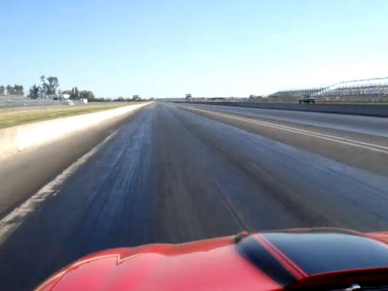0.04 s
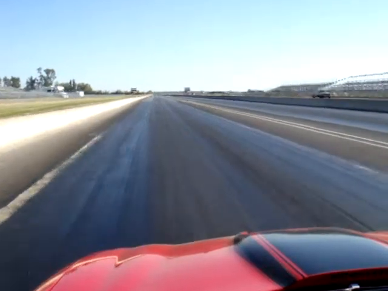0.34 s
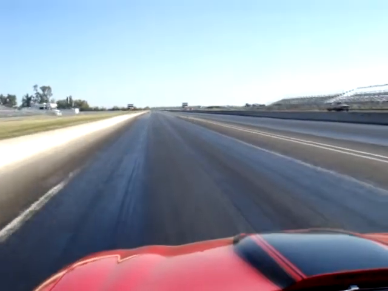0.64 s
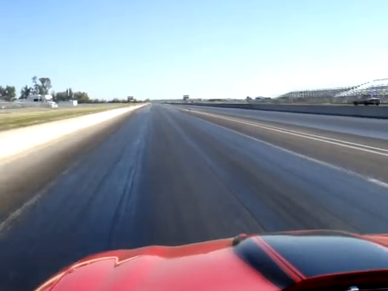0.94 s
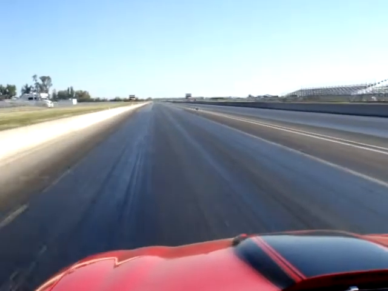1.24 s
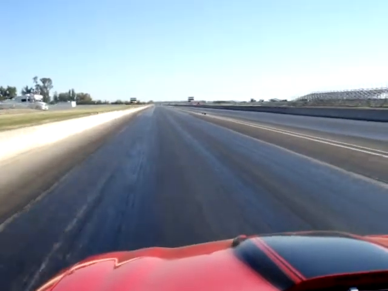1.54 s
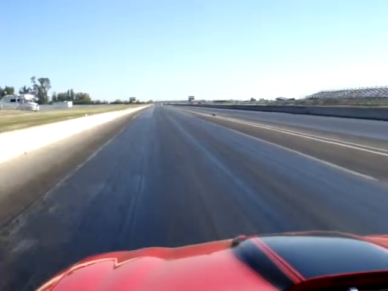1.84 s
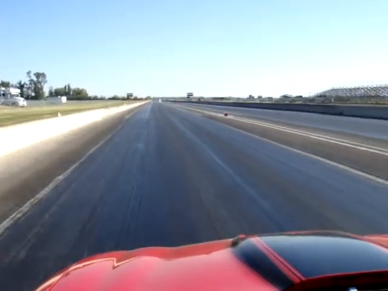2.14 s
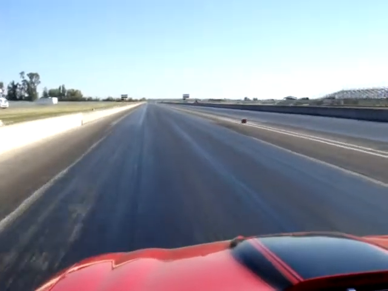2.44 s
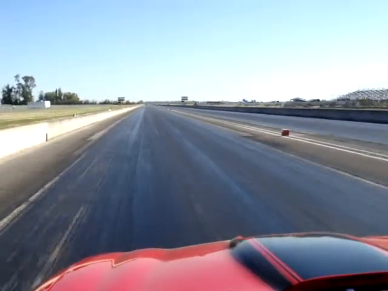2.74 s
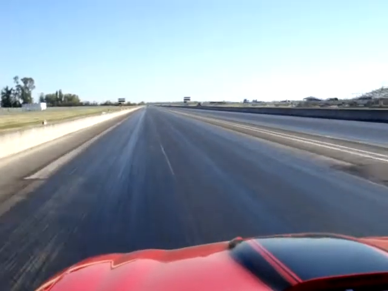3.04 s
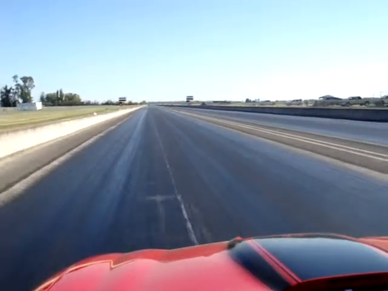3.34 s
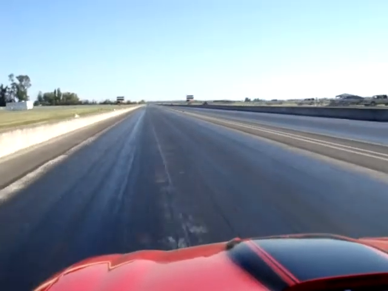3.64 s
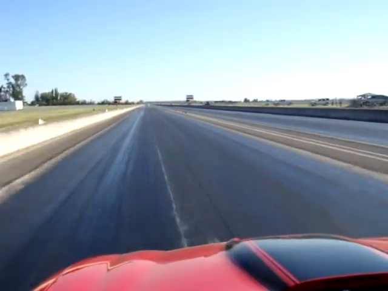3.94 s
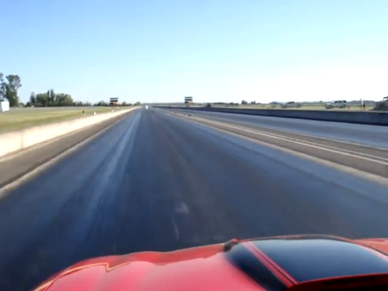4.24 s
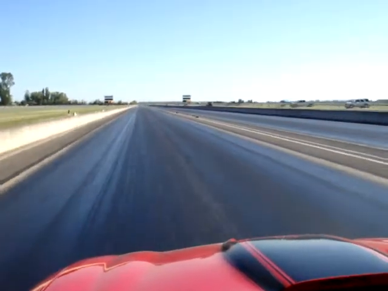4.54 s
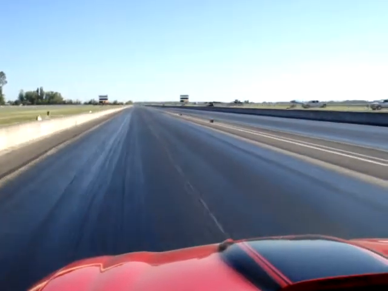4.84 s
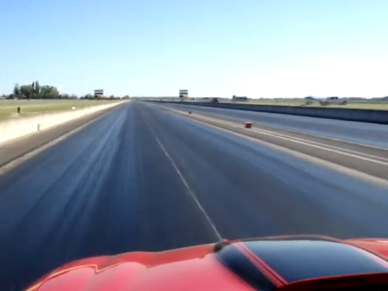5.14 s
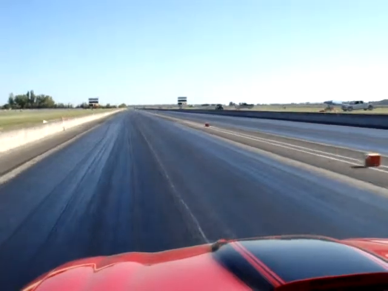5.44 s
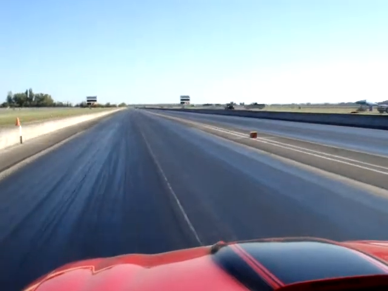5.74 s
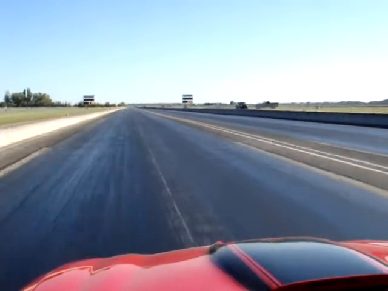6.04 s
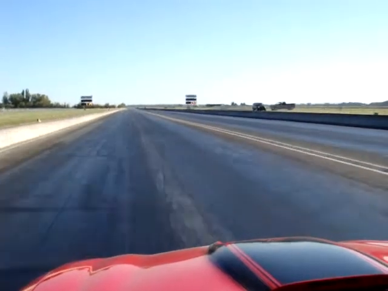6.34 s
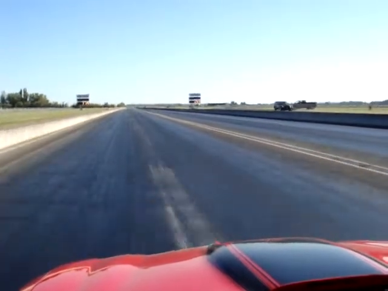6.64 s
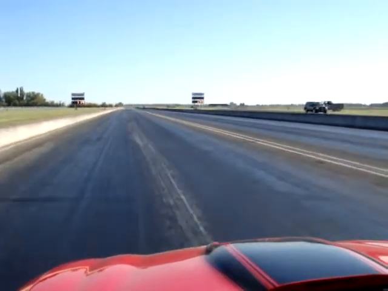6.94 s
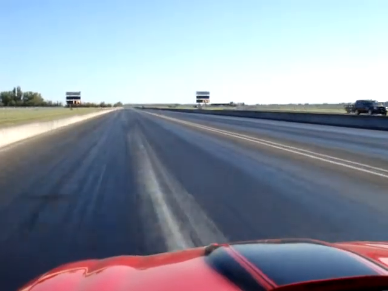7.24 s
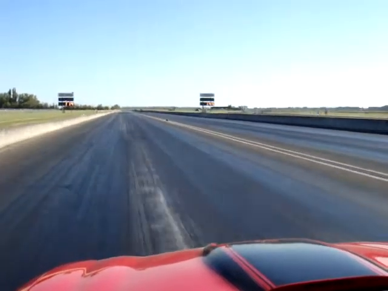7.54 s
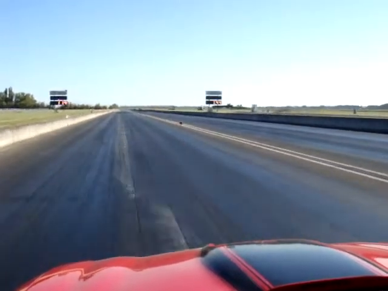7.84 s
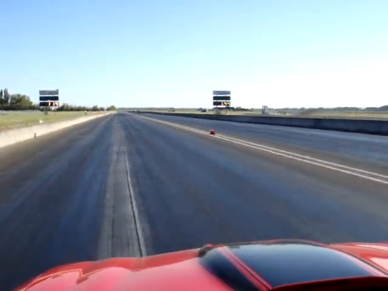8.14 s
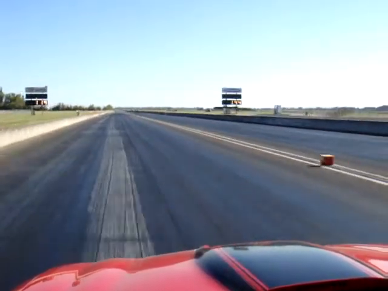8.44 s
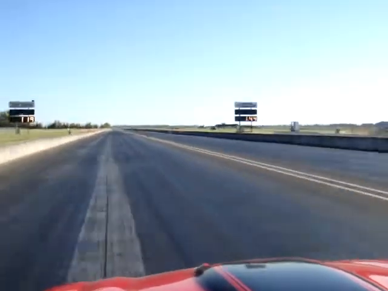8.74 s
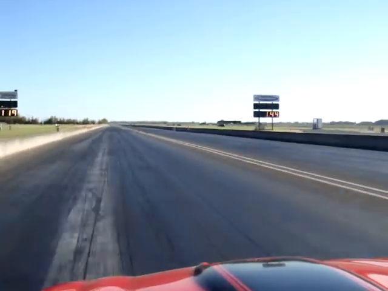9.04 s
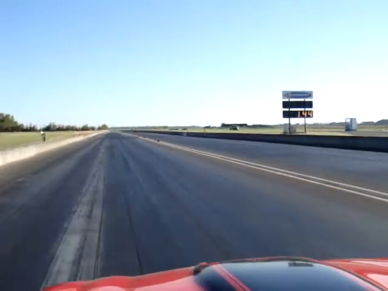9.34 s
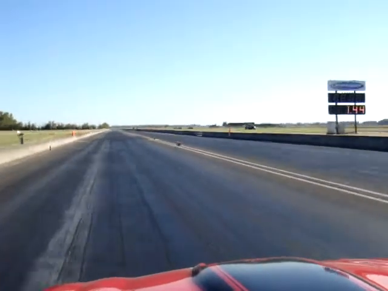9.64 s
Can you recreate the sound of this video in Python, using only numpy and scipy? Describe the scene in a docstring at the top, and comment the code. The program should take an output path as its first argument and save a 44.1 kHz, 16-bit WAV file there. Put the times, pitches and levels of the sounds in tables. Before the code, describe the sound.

A V8 car accelerates hard down a drag strip, heard from a microphone on its roof. The raspy, booming exhaust climbs in pitch and drops at each of three gear changes, with brief hoots and tyre chirps around the first two. A second V8 drones more faintly in the next lane. As speed builds, wind roars and tears over the microphone until it buries both engines.

```python
"""A V8 car accelerates down a drag strip through four gears, heard from its roof.
Uneven firing gives an exhaust note and a rasp of cracks and gas; boom and howl swell as the
revs cross resonances. All drop at each gear change, amid brief hoots and tyre chirps.
A second V8 drones in the next lane. As speed builds, wind tearing over the microphone
buries both engines, while a gain control holds the level."""
import sys
import numpy as np
from scipy import signal
from scipy.fft import rfft, irfft, next_fast_len
from scipy.io import wavfile
from scipy.ndimage import map_coordinates

SR = 44100
rng = np.random.default_rng(int(sys.argv[2]) if len(sys.argv) > 2 else 0)


def dump_mix(stems):
    """Bounce the given channels to the path in sys.argv[1] as a 16-bit WAV at rate SR."""
    frames = np.atleast_2d(stems).T  # one column per channel
    limited = np.clip(frames, -1, 1)  # hard clip at full scale
    pcm = np.round(limited * 32767).astype(np.int16)
    wavfile.write(sys.argv[1], SR, pcm)


N = 432180

# Each row, one gear: times in seconds of throttle opening, revs bottoming out, tyre grip and throttle
# shutting; lowest and highest four-stroke cycle rate in Hz; bow of the climb, 0-1.
GEARS = [(-.1, .31, .32, .83, 43.5, 50.7, .55), (1.16, 1.33, 1.53, 3.36, 36.6, 53.25, .25),
         (3.87, 4.02, 4.11, 7.62, 38.6, 54.3, .22), (8.1, 8.3, 8.3, 9.9, 40.8, 43.7, .22)]
# Each row, in firing order: strength in dB, lateness in cycles.
CYLINDERS = [(1, -0.00007), (-12, 0.016), (-2, -0.017), (0.5, 0.0103), (2, -0.018), (0.5, 0.013),
             (-3, -0.0102), (-5, 0.0326)]


def engine(pull):
    """The car's exhaust: note, boom and rasp, all dropping while the throttle is shut."""
    # Each row, one gear: note, growl, boom, howl and rasp gains in dB.
    voices = [(-14.5, -31.5, -27.5, -25, -18.5), (-14.5, -35, -21.5, -19, -20.5),
              (-15.5, -38, -23.5, -23, -24), (-22.5, -33.5, -28, -26, -22)]
    cycle_hz = revs(GEARS)
    gear, since_s = in_gear(GEARS)
    note_db, growl_db, boom_db, howl_db, rasp_db = np.array(voices)[gear].T
    cycles = crank(cycle_hz, unsteady=.0018)
    swell_db = 0.07 * (cycle_hz - 48)
    note = amp(note_db + swell_db) * exhaust_note(cycles, flutter_cycles=.003)
    boom = exhaust_boom(cycles, cycle_hz, growl_db, boom_db, howl_db)
    rasp = exhaust_rasp(cycles, jitter_s=.000055, scatter_db=2.5, gas=1.23, throb=0.78)
    bite_db = 3 * np.exp(-since_s / 2.05)  # hardest as the throttle opens
    coasting = 1 - pull
    return amp(-15.5 * coasting) * (note + boom) + amp(rasp_db + bite_db - 13.5 * coasting) * rasp


def exhaust_note(cycles, flutter_cycles):
    """Uneven firing fills most multiples of the cycle rate; turbulence roughens the high ones most."""
    # Each row: multiple of the cycle rate, level in dB.
    orders = [(4, -42), (6, -42), (7, -39), (9, -30), (10, -34.5), (11, -31), (12, -34), (13, -30),
              (14, -36), (15, -31), (16, -31), (18, -29.5), (19, -32), (20, -32.5), (21, -34), (22, -34),
              (23, -31.5), (24, -36), (25, -34), (26, -30), (27, -32), (28, -36), (29, -39), (30, -36),
              (31, -30.5), (32, -33), (34, -32.5), (35, -32), (36, -36), (39, -34), (40, -34), (43, -35.5),
              (44, -35.5), (47, -37), (50, -37)]
    ragged = cycles + flutter_cycles * wobble(90)
    return unit(sum(amp(db) * harmonic(ragged, order, waver_db=3) for order, db in orders))


def exhaust_rasp(cycles, jitter_s, scatter_db, gas, throb):
    """Each firing sends a sharp crack down the pipe, then a puff of hissing gas."""
    # Each row: frequency in Hz, gain in dB.
    crackle_spectrum = [(20, -85), (900, -21.5), (1450, 0.5), (1900, 1.5), (2550, 1.5), (3300, -4.5),
                        (4700, -9), (7000, -16.5), (10000, -26)]
    strength_db, late_cycles = np.transpose(CYLINDERS)
    firing = np.arange(int(cycles[-1] * len(CYLINDERS)))
    cylinder = firing % len(CYLINDERS)
    chance = rng.standard_normal((len(firing), 2))
    onset = np.interp(firing / len(CYLINDERS) + late_cycles[cylinder], cycles, np.arange(N))
    onset = np.clip(onset + jitter_s * SR * chance[:, 0], 0, N - 1).astype(int)
    strength = amp(strength_db[cylinder] + scatter_db * chance[:, 1])
    t = np.arange(SR // 100) / SR
    # Each cylinder's header leaves its own reflections.
    shapes = rng.standard_normal((len(CYLINDERS), len(t))) * amp(-60 * t / 0.023)
    shapes[:, 0] = -9.5  # shock front
    samples = onset[:, None] + np.arange(len(t))
    cracks = np.bincount(samples.ravel(), (strength[:, None] * shapes[cylinder]).ravel(), N)[:N]
    impulses = np.bincount(onset, strength, N)
    puffs = unit(signal.oaconvolve(impulses, amp(-60 * t / 0.019))[:N])
    hiss = (1 + throb * puffs) * rng.standard_normal(N)
    return coloured(unit(cracks) + gas * unit(hiss), crackle_spectrum)


def exhaust_boom(cycles, cycle_hz, growl_db, boom_db, howl_db):
    """The firing note booms above a growl; a howl swells in the pipe's resonances."""
    # Each row: centre in Hz, width in Hz, gain in dB.
    boom_modes = [(299.5, 36, -1), (360.6, 35, -1.5), (432.6, 26, 4)]
    howl_modes = [(810, 69, -1), (872, 36, -1.5), (760, 400, -12.5)]

    def ringing(modes, order, waver_db):
        return resonance(order * cycle_hz, modes) * unit(harmonic(cycles, order, waver_db))
    growl = amp(growl_db) * unit(harmonic(cycles, order=5, waver_db=-0.9))
    boom = amp(boom_db) * ringing(boom_modes, order=8, waver_db=3.0)
    howl = amp(howl_db) * ringing(howl_modes, order=17, waver_db=1.0)
    return growl + boom + howl


def revs(gears):
    """Cycle rate in Hz: climbs ever more slowly through each gear, falls at the change."""
    # Revs held for launch: end time in seconds, cycle rate in Hz.
    launch = (.07, 49.7)
    progress = np.linspace(0, 1, num=20)
    points = [launch]
    for _, bottom_s, grip_s, shut_s, low_hz, high_hz, bow in gears:
        climb_s = grip_s + (shut_s - grip_s) * progress
        climb_hz = low_hz + (high_hz - low_hz) * (progress + bow * progress * (1 - progress))
        points += [(bottom_s, low_hz), *zip(climb_s, climb_hz)]
    return np.interp(np.arange(N) / SR, *np.transpose(points))


def throttle(gears, move_s):
    """1 while a gear pulls, 0 during the changes."""
    t = np.arange(N) / SR
    return sum(np.clip(np.minimum(t - open_s, shut_s - t) / move_s + .5, 0, 1)
               for open_s, _, _, shut_s, *_ in gears)


def in_gear(gears):
    """Per sample: gear index, seconds from its throttle opening."""
    t = np.arange(N) / SR
    open_s = np.transpose(gears)[0]
    gear = np.maximum(np.searchsorted(open_s, t) - 1, 0)
    return gear, np.abs(t - open_s[gear])


def crank(cycle_hz, unsteady):
    """Cycles turned by an engine whose speed trembles slightly."""
    return np.cumsum(cycle_hz * (1 + unsteady * wobble(25))) / SR


def harmonic(cycles, order, waver_db):
    """One exhaust harmonic, wavering in the moving air."""
    return amp(waver_db * wobble(7)) * np.sin(2 * np.pi * (order * cycles + rng.random()))


def resonance(hz, modes):
    """Gain of a tone gliding through resonances."""
    return np.sqrt(sum(amp(db) ** 2 / (1 + (2 * (hz - centre_hz) / width_hz) ** 2) ** 2
                       for centre_hz, width_hz, db in modes))


def wind(pull, start_m_per_s=8.7, power_w_per_kg=115):
    """Engine power builds road speed; the wind grows louder and brighter with it."""
    # Each row: frequency in Hz, gain in dB.
    rumble_spectrum = [(20, -15), (45, -14.5), (90, -0.5), (140, 5), (220, -4.5), (500, -27.5),
                       (10000, -94)]
    work_j_per_kg = power_w_per_kg * np.cumsum(pull) / SR
    gained_m_per_s = np.sqrt(start_m_per_s ** 2 + 2 * work_j_per_kg) - start_m_per_s
    pace = np.abs(gained_m_per_s / gained_m_per_s[-1])

    def rise(start_db, top_db, exponent):
        return amp(start_db + (top_db - start_db) * pace ** exponent)
    roar, tear = buffeting(roar_depth_db=1.13, tear_depth_db=3.0, spit_depth_db=4.0)
    rumble = coloured(rng.standard_normal(N), rumble_spectrum)
    flutter = amp(0.42 * wobble(12))
    return (rise(-22.5, -5.5, exponent=1.08) * roar
            + rise(-27.5, -6.8, exponent=1.96) * flutter * tear
            + rise(-48.5, -31.5, exponent=0.89) * rumble)


def buffeting(roar_depth_db, tear_depth_db, spit_depth_db):
    """Eddies strike the microphone: a roar, and a tearing hiss that spits with the smallest ones."""
    # Each row: frequency in Hz, gain in dB.
    roar_spectrum = [(20, -42), (45, -37.5), (100, -26.5), (160, -13.5), (240, -7.5), (380, -3),
                     (620, -1.5), (950, -3.5), (1400, -7.5), (2200, -16), (4000, -30), (10000, -80)]
    tear_spectrum = [(20, -60), (300, -10), (800, -3), (1500, 2.5), (2200, 0), (3000, -3.5), (4500, -9),
                     (6000, -14.5), (10000, -26.5)]
    spit_spectrum = [(20, -69.5), (1200, -14), (3000, 1.5), (4500, -3), (6500, -7), (10000, -16.5)]
    eddies = unit(wobble(1300) + .55 * wobble(300) + .13 * wobble(60))
    roar = coloured(amp(roar_depth_db * eddies) * rng.standard_normal(N), roar_spectrum)
    tear = coloured(amp(tear_depth_db * eddies) * rng.standard_normal(N), tear_spectrum)
    small_eddies = unit(1.5 * eddies + wobble(2200))
    spit = coloured(amp(spit_depth_db * small_eddies) * rng.standard_normal(N), spit_spectrum)
    return roar, unit(tear + amp(-8.5) * spit)


def rival():
    """The second V8 drones across the strip, its treble lost."""
    # Columns as in GEARS.
    gears = [(.85, .85, .85, 2.15, 41.1, 52.9, .22), (2.7, 2.7, 2.7, 4.98, 40.7, 52.1, .22),
             (5.45, 5.45, 5.45, 9.9, 41, 53.2, .22)]
    # Gain in dB per gear.
    gear_db = [-21.5, -20.5, -23.5]
    # Each row: multiple of the cycle rate, level in dB.
    orders = [(4, -16), (5, -10), (6, -17), (8, 1), (9, -9), (11, -10), (12, -10), (13, -8), (14, -11),
              (15, -13), (17, -10), (18, -13), (20, -14), (21, -14), (24, -13)]
    # Each row, a resonance at the firing rate: centre in Hz, width in Hz, gain in dB.
    modes = [(353, 51, 0.5), (380, 400, -11)]
    cycle_hz = revs(gears)
    cycles = crank(cycle_hz, unsteady=0.0033)
    note = sum(amp(db) * harmonic(cycles, order, waver_db=2.0) for order, db in orders)
    coasting = 1 - throttle(gears, move_s=0.18)
    gear, _ = in_gear(gears)
    level_db = np.take(gear_db, gear) - 12 * coasting
    return amp(level_db) * resonance(len(CYLINDERS) * cycle_hz, modes) * unit(note)


def chirps():
    """Short, unsteady hoots and tyre chirps around the gear changes."""
    # Each row: peak time in seconds, length in seconds, pitch in Hz, pitch spread in Hz, level in dB.
    events = [(.84, 0.059, 510, 52, -23.5), (.92, 0.051, 855, 35, -19), (1.1, 0.072, 765, 70, -19),
              (1.3, 0.059, 870, 37, -22), (4.05, 0.31, 1015, 35, -21)]
    t = np.arange(N) / SR
    out = np.zeros(N)
    for peak_s, length_s, hz, spread_hz, db in events:
        pitch_hz = hz + spread_hz / 2 * wobble(120)
        envelope = np.exp(-2 * ((t - peak_s) / length_s) ** 2)
        out += amp(db) * envelope * unit(np.sin(2 * np.pi * np.cumsum(pitch_hz) / SR))
    return out


def amp(db):
    """Decibels to gain."""
    return 10 ** (np.asarray(db) / 20)


def unit(x):
    """Scale to rms 1."""
    return x / np.sqrt(np.mean(x ** 2) + 1e-20)


def wobble(knots_per_s):
    """Smooth random curve, rms 1."""
    knots = rng.standard_normal(int(N * knots_per_s / SR) + 4)
    fine = np.arange(0, len(knots) - 1, 1 / 4)
    return unit(np.interp(np.arange(N) * knots_per_s / SR, fine, map_coordinates(knots, [fine])))


def coloured(x, spectrum):
    """Minimum-phase filter of the given (Hz, dB) shape; output rms 1."""
    size = 4096
    hz, db = np.transpose(spectrum)
    bin_db = np.interp(np.log(np.fft.rfftfreq(size, 1 / SR) + 1), np.log(hz), db)
    cepstrum = irfft(np.log(amp(bin_db)))
    cepstrum[1:size // 2] *= 2
    cepstrum[size // 2 + 1:] = 0
    impulse_response = irfft(np.exp(rfft(cepstrum)))
    return unit(signal.fftconvolve(x, impulse_response)[:N])


def gain_control(x, hold_db, react_s):
    """Gain falls as the running power passes the held level."""
    pole = np.exp(-1 / (react_s * SR))
    power = signal.lfilter([1 - pole], [1, -pole], (x / amp(hold_db)) ** 2 - 1) + 1
    return x / (1 + power ** 4) ** (1 / 8)


def overload(x, ceiling, hardness):
    """Peaks round off towards the ceiling."""
    return x / (1 + np.abs(x / ceiling) ** hardness) ** (1 / hardness)


def band_limit(x, top_hz):
    """Brick-wall low-pass."""
    size = next_fast_len(N + SR // 2)
    return irfft(rfft(x, size) * (np.fft.rfftfreq(size, 1 / SR) < top_hz), size)[:N]


def scene():
    """The throttle drives the exhaust and, through road speed, the wind that buries it."""
    pull = throttle(GEARS, move_s=0.061)
    return (engine(pull) + wind(pull) + rival() + chirps())[None]


def record(dry):
    """Microphone chain: gain control, soft overload, band limit."""
    held = gain_control(dry[0], hold_db=-12.5, react_s=0.077)
    rounded = overload(held, ceiling=1.14, hardness=7.8)
    return band_limit(rounded, top_hz=10100)[None]


dry = scene()
out = record(dry)
dump_mix(out)
```